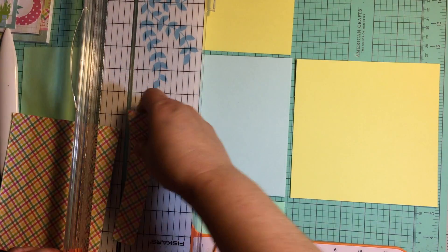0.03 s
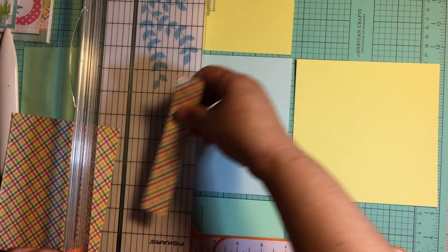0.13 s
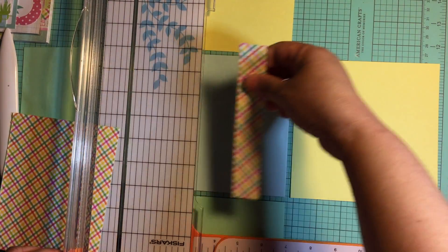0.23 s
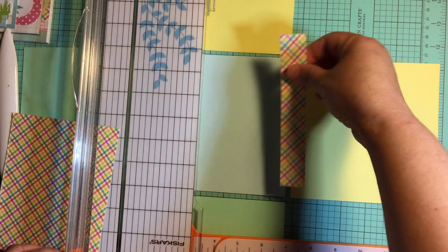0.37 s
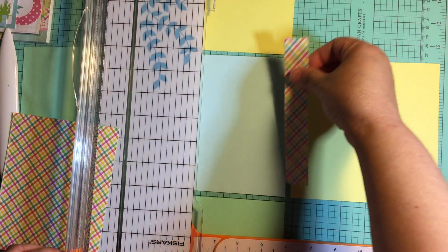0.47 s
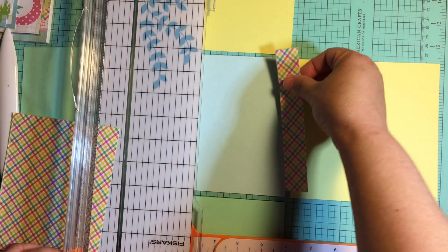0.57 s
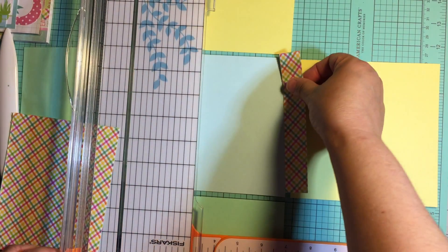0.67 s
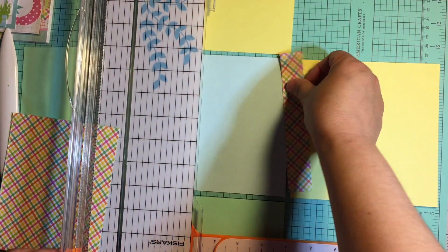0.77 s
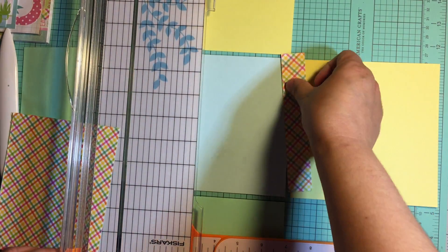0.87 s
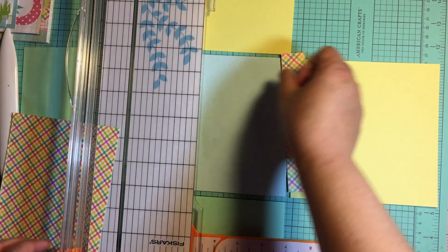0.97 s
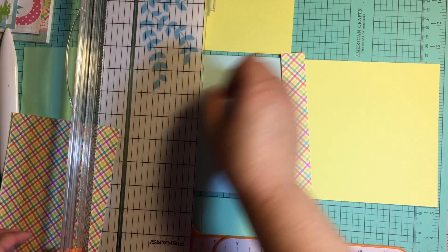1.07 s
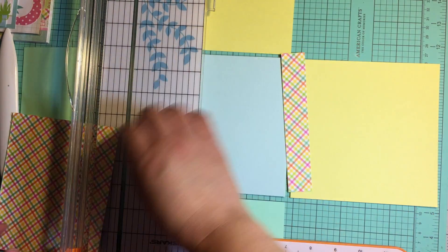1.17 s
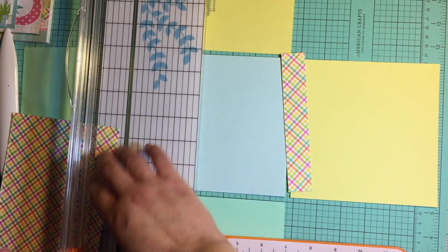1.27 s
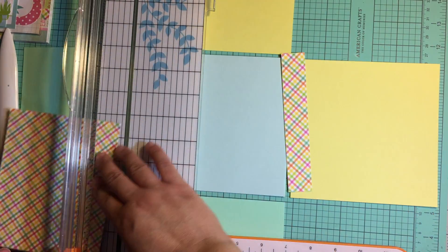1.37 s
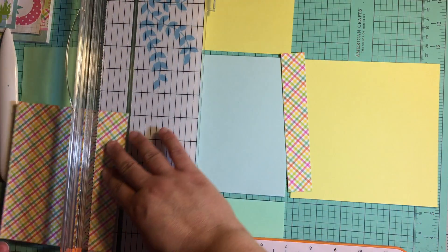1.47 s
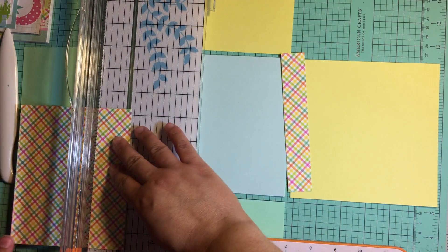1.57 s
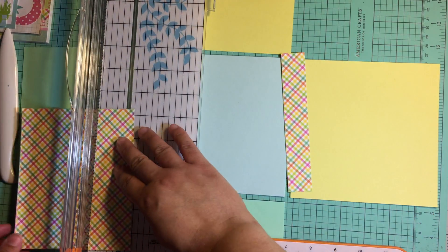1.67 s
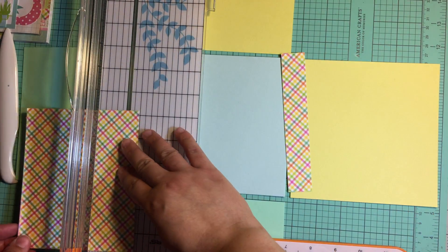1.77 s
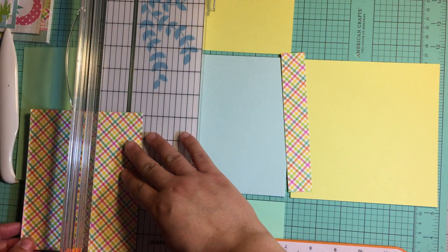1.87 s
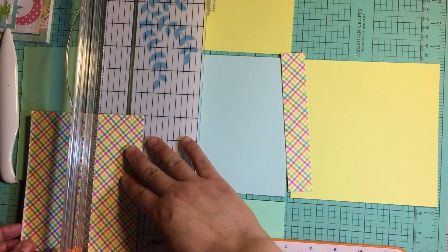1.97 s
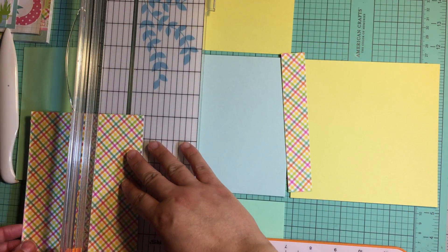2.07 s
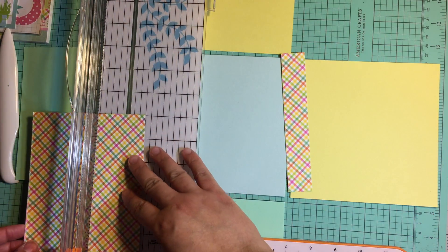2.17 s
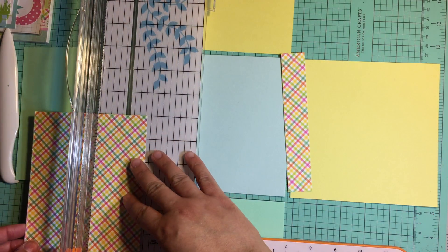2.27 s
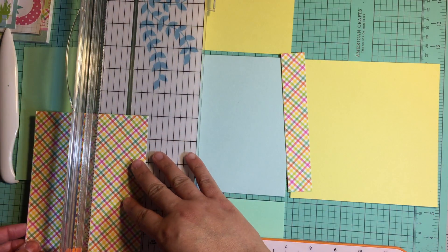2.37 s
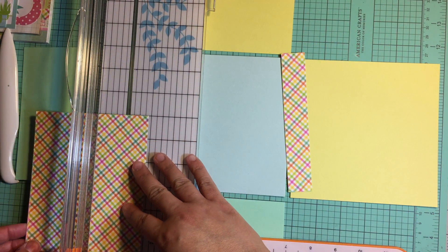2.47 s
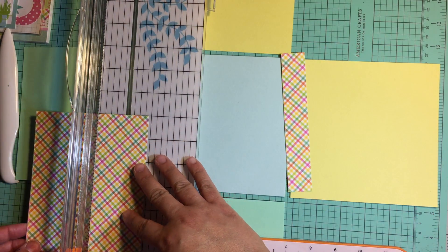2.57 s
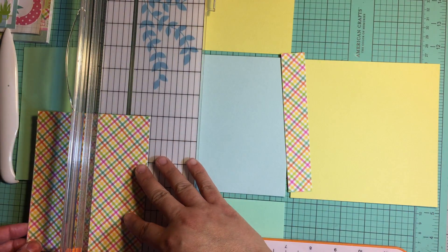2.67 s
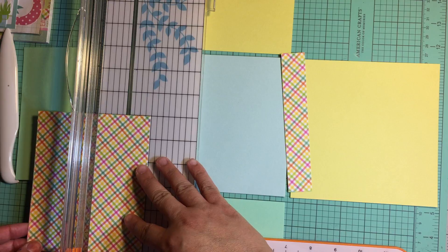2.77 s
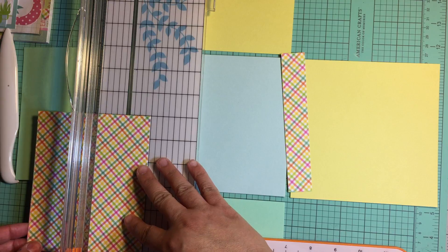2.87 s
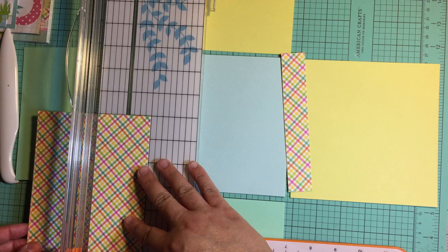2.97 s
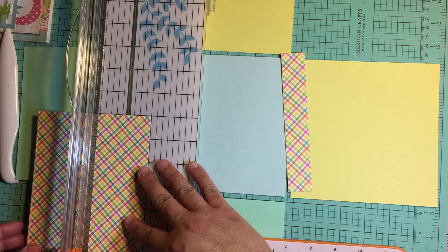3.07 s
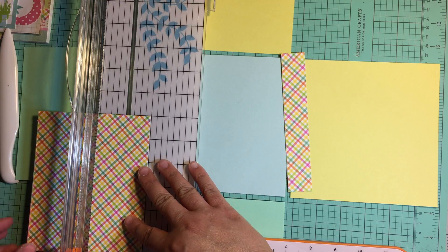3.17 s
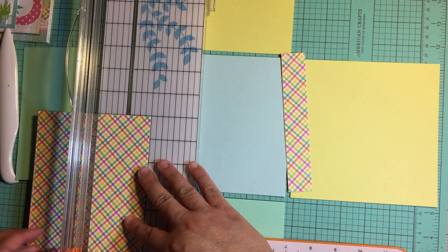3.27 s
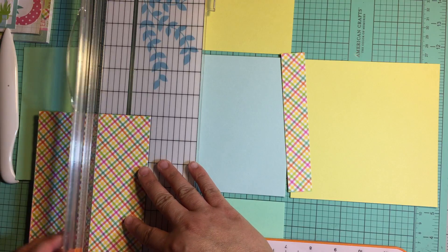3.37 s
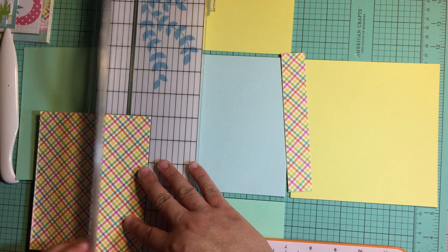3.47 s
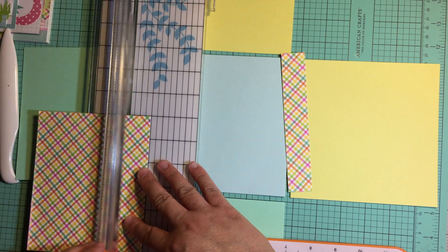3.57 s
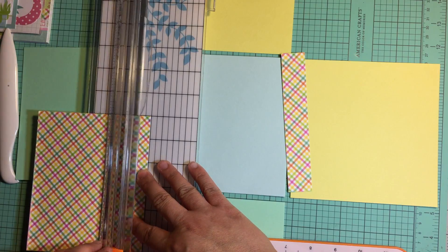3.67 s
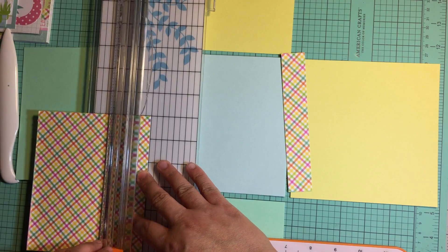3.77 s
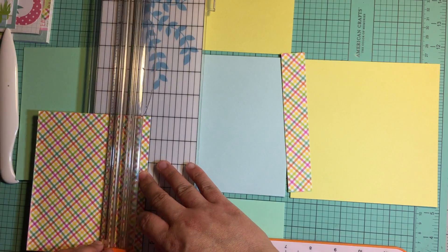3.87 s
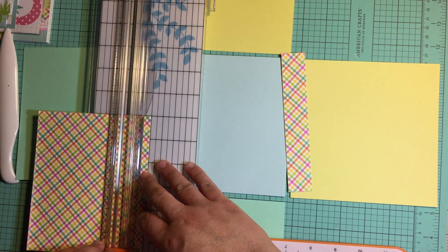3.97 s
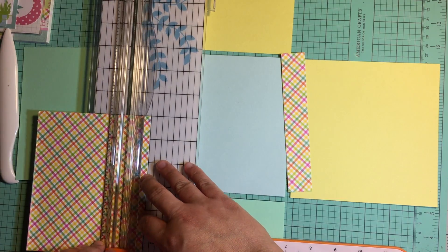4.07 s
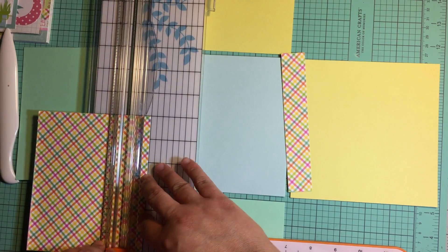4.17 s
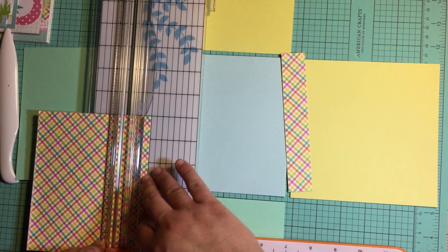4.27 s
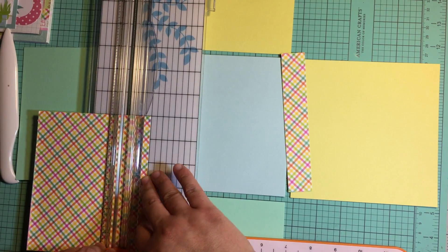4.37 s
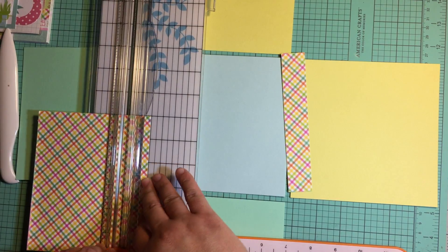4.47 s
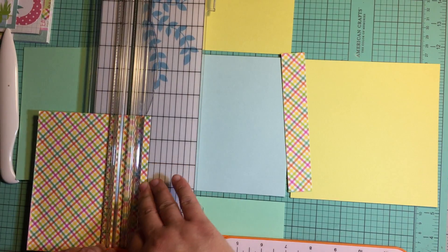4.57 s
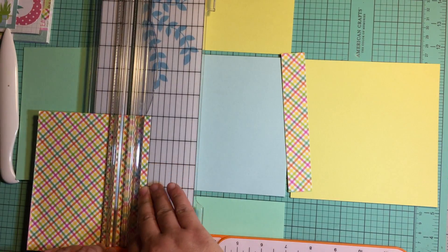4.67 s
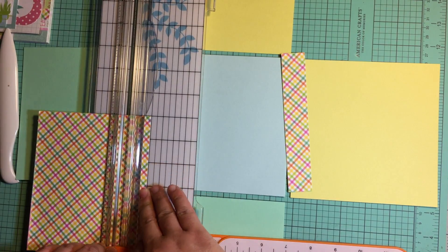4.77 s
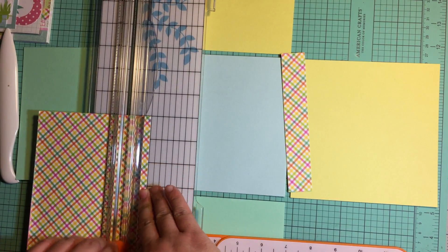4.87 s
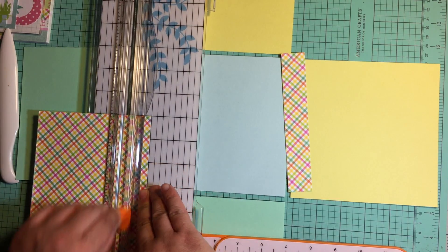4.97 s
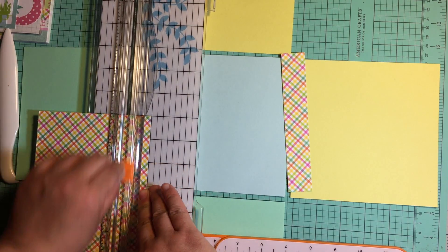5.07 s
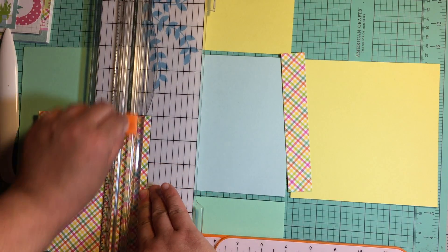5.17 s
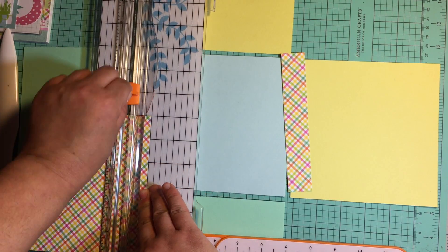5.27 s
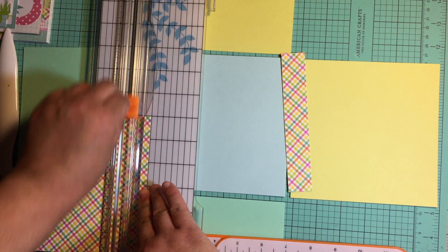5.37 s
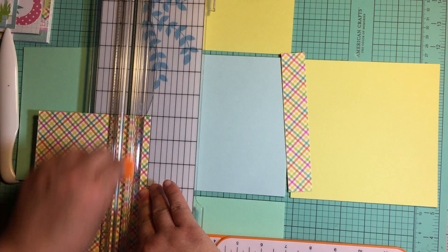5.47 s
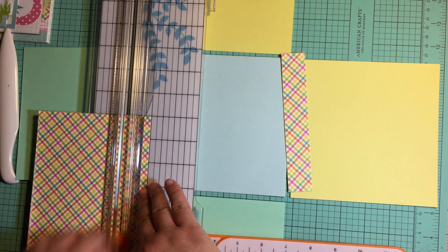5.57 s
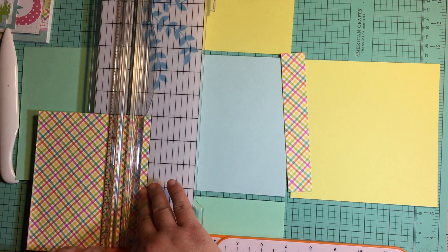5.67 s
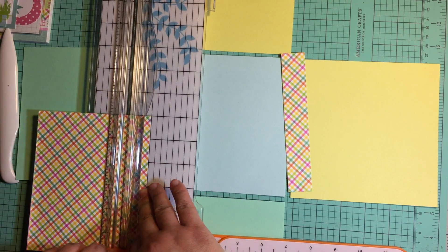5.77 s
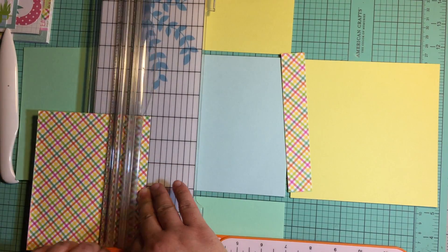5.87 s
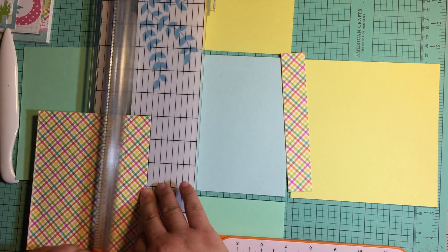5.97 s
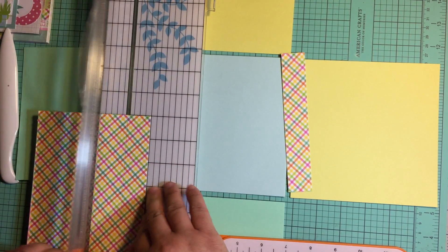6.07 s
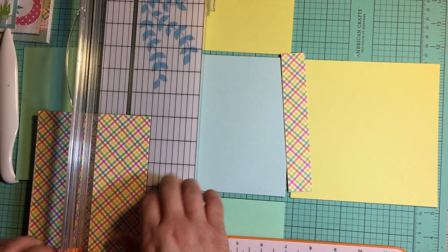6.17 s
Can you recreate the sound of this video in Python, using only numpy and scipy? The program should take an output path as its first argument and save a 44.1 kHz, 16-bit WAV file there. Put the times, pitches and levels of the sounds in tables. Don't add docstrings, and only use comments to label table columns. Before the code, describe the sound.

Close, quiet desk sounds: papery flicks and scuffs, a rattling plastic guide rail dropping, then two harsh blade scrapes ending in small knocks.

```python
import sys
import numpy as np
from scipy import signal
from scipy.fft import rfft, irfft, next_fast_len
from scipy.io import wavfile

SR = 44100
rng = np.random.default_rng(int(sys.argv[2]) if len(sys.argv) > 2 else 0)


def dump(signal):
    limited = np.clip(np.atleast_2d(signal).T, -1, 1)
    pcm = np.round(limited * 32767).astype(np.int16)
    wavfile.write(sys.argv[1], SR, pcm)


def linear_from_db(decibels):
    return 10 ** (np.asarray(decibels, float) / 20)


N = 274787


def rms_one(x):
    return x / np.sqrt(np.mean(x ** 2) + 1e-20)


def in_time(rows):
    s, *columns = np.transpose(rows)
    return [np.interp(np.arange(N) / SR, s, c) for c in columns]


def gains(tables, fade_s=0.015):
    out, t = 0, np.arange(N) / SR
    for rows in tables:
        start, end = rows[0][0], rows[-1][0]
        gate = np.interp(t, [start - fade_s, start, end, end + fade_s], [0, 1, 1, 0])
        out = out + gate * linear_from_db(np.array(in_time(rows)))
    return out


def slow_noise(noise, rate_hz, skip):
    r = np.exp(-2 * np.pi * rate_hz / SR)
    return signal.lfilter([1], [1, -2 * r, r * r], noise)[skip:]


def drift(rate_hz):
    return rms_one(slow_noise(rng.standard_normal(N + 9000), rate_hz, 9000))


def coloured(x, spectrum):
    hz, db = np.transpose(spectrum)
    size = next_fast_len(N)
    f = np.fft.rfftfreq(size, 1 / SR) + 1
    shape = linear_from_db(np.interp(np.log(f), np.log(hz), db, left=-90, right=-90))
    return rms_one(irfft(rfft(x, size) * shape, size)[:N])


def resonant(x, peaks):
    out = 0
    for k, (hz, width, db) in enumerate(peaks):
        r = np.exp(-np.pi * width / SR)
        poles = [1, -2 * r * np.cos(2 * np.pi * hz / SR), r * r]
        mode = signal.lfilter([(1 - r * r) / 2, 0, (r * r - 1) / 2], poles, x)
        out = out + (-1) ** k * linear_from_db(db) * mode
    return out


def band(x, low_hz, high_hz):
    return signal.sosfilt(signal.butter(2, [low_hz, high_hz], "band", fs=SR, output="sos"), x)


def grains(per_s, spread_db):
    sizes = linear_from_db(spread_db * np.minimum(rng.exponential(1, N), 5)) * rng.choice([-1, 1], N)
    return rms_one(sizes * (rng.random(N) < per_s / SR))


def ring(force, hz, t60):
    r, w = linear_from_db(-60 / (t60 * SR)), 2 * np.pi * hz / SR
    return signal.lfilter([0, np.sin(w)], [1, -2 * r * np.cos(w), r * r], force)


def blow(contact_s, buzz_db=-22, buzz_s=0.0087, rise_s=0.00045):
    t = np.arange(3000) / SR
    swell = (1 - np.exp(-t / (rise_s + 0.096 * contact_s))) ** 2
    decay = np.exp(-t / max(contact_s, 2e-4)) + linear_from_db(buzz_db) * np.exp(-t / buzz_s)
    return rms_one(swell * decay * rng.standard_normal(3000)) / np.sqrt(3000)


def strike(hz, t60, *contact, **shape):
    out = ring(blow(*contact, **shape), hz, t60)
    click = ring(np.arange(3000) == 0, hz, t60)
    scatter = linear_from_db(1.5 * rng.standard_normal())
    return out * np.linalg.norm(click) / np.linalg.norm(out) * scatter


def struck(hits, column, modes, gain_db):
    out = np.zeros(N + 3000)
    for hz, db, t60 in modes:
        for row in hits:
            out[round(row[0] * SR):][:3000] += linear_from_db(row[column] + db + gain_db) * strike(hz, t60, row[5])
    return out[:N]


def lasting(hits, contact_s):
    return [(*row, contact_s) for row in hits]


# (frequency [Hz], density [dB])
AIR = [(15, -34), (25, -21), (58, 2.5), (119, -4), (264, -11), (398, -12.5), (496, -16.5), (585, -15.5),
       (907, -17.5), (2300, -19.5), (2640, -21), (3880, -21.5), (10400, -28), (16100, -30), (17500, -35.5)]


def air():
    hum = rms_one(resonant(rng.standard_normal(N), [(122, 10, 0)]))
    return linear_from_db(-68) * coloured(rng.standard_normal(N), AIR) + linear_from_db(-72.5) * hum


# (frequency [Hz], level [dB], T60 [s])
KNOCK_MODES = [(1207, 4, 0.0058), (1500, -1, 0.0088), (1754, -7, 0.019)]


def knocks(hits):
    hollow = np.zeros(N + 3000)
    for s, snap_db, knock_db, hz, clack_db, contact_s in hits:
        hollow[round(s * SR):][:3000] += linear_from_db(knock_db + 5.5) * strike(hz, 0.017, contact_s, rise_s=0.0012)
    return band(hollow[:N] + struck(hits, column=2, modes=KNOCK_MODES, gain_db=-2.0), 570, 2600)


# (frequency [Hz], level [dB], T60 [s])
CLACK_MODES = [(2470, -0.5, 0.0021), (3420, 2, 0.0026), (4230, -5, 0.0025), (4850, -11.5, 0.0018)]


def clacks(hits, modes=CLACK_MODES, gain_db=3.5):
    return band(struck(hits, column=4, modes=modes, gain_db=gain_db), 1307, 8000)


# (frequency [Hz], level [dB], T60 [s])
SNAP_MODES = [(5440, 0, 0.0033), (6770, 1, 0.0029), (8500, 2, 0.0017), (9360, -3, 0.0019),
              (12100, -2, 0.0012), (13450, -20.5, 0.0018), (15400, -9.5, 0.0026)]


def snaps(hits, gain_db, low_hz, high_hz):
    return band(struck(hits, column=1, modes=SNAP_MODES, gain_db=gain_db), low_hz, high_hz)


def hard_blows(hits):
    return knocks(hits) + clacks(hits) + snaps(hits, -5.5, 4200, 14600)


# (time [s], edge snap [dB], knock [dB], knock pitch [Hz], clack [dB])
PAPER_TAPS = [
    (0.0004, -15.5, -36, 800, -22),
    (0.3223, -47, -47.5, 1770, -44),
    (0.4286, -45, -60, 1540, -54),
    (0.8555, -21, -45, 1700, -20.5),
    (1.4672, -47, -51.5, 1030, -73),
    (3.19, -79, -65, 1100, -74),
    (5.9388, -33, -44, 920, -48),
    (6.035, -41, -67, 964, -64.5),
]
# (time [s], edge snap [dB], knock [dB], knock pitch [Hz], clack [dB])
PAPER_SHOVES = [
    (0.9703, -66, -54, 1260, -47.5),
    (1.3855, -50, -47, 1010, -50),
    (1.4039, -32, -39.5, 1080, -37),
    (1.4208, -37, -39, 1050, -41.5),
    (2.0538, -62, -64, 1020, -45.5),
    (1.7035, -61, -45, 1080, -75),
    (1.72, -70, -48, 1130, -75),
    (1.672, -70, -50, 1000, -75),
    (2.039, -60, -48, 980, -47),
]
# (time [s], edge snap [dB], knock [dB], knock pitch [Hz], clack [dB])
PAPER_CRACKS = [
    (0.1262, -25, -70, 1880, -53),
    (0.13, -47, -75, 1880, -60),
    (0.17, -45, -71, 1800, -72),
    (0.4155, -52, -68, 1800, -61),
    (1.516, -25, -43.5, 1060, -71),
    (6.0352, -50, -68, 970, -65),
    (6.2055, -52, -68, 1340, -58),
    (5.861, -55, -59.5, 1010, -72),
    (5.888, -57, -74, 980, -70),
]
# (time [s], edge snap [dB], knock [dB], knock pitch [Hz], clack [dB])
SLAPS = [
    (0.8782, -8.5, -40, 1228, -21.5),
    (0.8832, -6.5, -31.5, 1024, -30.5),
]
# (frequency [Hz], level [dB], T60 [s])
SLAP_MODES = [(1900, -5, 0.004), (3310, 0, 0.0095), (4400, -7, 0.0025)]


def paper_blows():
    slaps = lasting(SLAPS, 0.001)
    taps = lasting(PAPER_TAPS, 0.0025) + lasting(PAPER_SHOVES, 0.0075) + lasting(PAPER_CRACKS, 0.00076)
    hits = taps + slaps
    clack = clacks(taps) + clacks(slaps, SLAP_MODES, gain_db=3.0)
    return knocks(hits) + clack + snaps(hits, -6.5, 3800, 17000)


# (time [s], peak level [dB], pitch [Hz])
THUDS = [(0.001, -46, 132), (0.884, -44, 123.4), (0.884, -38, 540), (0.002, -42, 340), (4.09, -46, 55),
         (4.2, -56, 50), (3.76, -50, 55), (1.397, -50, 106), (1.415, -52.5, 120), (1.504, -48, 124),
         (3.754, -42.5, 145), (3.821, -52, 334), (3.943, -48, 122), (3.977, -45.5, 133), (4.01, -48, 124),
         (4.084, -41.5, 122), (4.53, -51, 310), (4.8, -44, 235), (5.303, -34, 124), (5.421, -51, 289),
         (5.452, -44, 124), (5.712, -39.5, 114), (5.948, -49, 131), (5.981, -43, 193), (6.219, -48, 315)]


def desk_thuds():
    out = np.zeros(N + 9000)
    push = np.pad(np.hanning(round(0.0019 * SR)), (0, 9000))[:9000]
    push = push / push.sum()
    for s, db, hz in THUDS:
        i = round(s * SR)
        out[i:][:9000] += linear_from_db(db) * ring(push, hz, 19.3 / hz)
        board = strike(288.5, 0.021, 0.012, rise_s=0.0019)
        out[i:][:3000] += linear_from_db(db + 4.5) * band(board, 146.6, 572)
    return out[:N]


# (start [s], end [s], start level [dB], end level [dB], free edge in the air [dB])
RUBS = [(0.015, 0.028, -58, -71, 11.5), (0.045, 0.125, -68.5, -70.5, 25.5), (0.127, 0.18, -64, -78, 19),
        (0.193, 0.326, -76.5, -79.5, 26), (0.331, 0.392, -63.5, -77.5, 14), (0.408, 0.494, -68, -74.5, 12),
        (0.544, 0.632, -73, -65.5, -0.5), (0.724, 0.8, -70, -74, 0.5), (0.804, 0.861, -76, -50, 7),
        (1.44, 1.506, -72, -57, 1), (1.526, 1.651, -61, -60, 3.5), (1.67, 1.737, -71, -64.5, 1.5),
        (1.79, 2.063, -73.5, -73, 7), (2.17, 2.347, -65, -73, 3.5), (2.425, 2.769, -70.5, -71.5, 0.5),
        (3.777, 3.862, -55.5, -64, -12), (3.855, 3.944, -74, -62, 3), (3.965, 4.04, -54, -63.5, -37),
        (4.056, 4.073, -68, -44, 2.5), (4.172, 4.242, -70, -82, 9.5), (5.868, 5.94, -73, -68.5, -2)]


def rubbing():
    share = np.array([0, 0.35, 1])
    offset_db = np.array([0, -4, 0])
    spans = []
    for t0, t1, db0, db1, edge_db in RUBS:
        extra_db = edge_db * share + offset_db
        spans.append([(t0, *(db0 + extra_db)), (t1, *(db1 + extra_db))])
    return gains(spans)


# (frequency [Hz], density [dB])
DRAG = [(290, -48), (500, -9.5), (590, 2), (650, -45), (874, 3), (1990, 1), (2600, -5), (3380, -42.5),
        (5720, -120)]
# (frequency [Hz], width [Hz], level [dB])
SCUFF = [(2630, 467, -2.5), (3480, 580, -1.5), (4260, 660, -2)]
# (frequency [Hz], density [dB])
RUSTLE = [(2350, -49.5), (4000, -14), (4310, -18), (4970, -8.5), (7990, -1.5), (9440, -0.5), (10400, -3.5),
          (11700, -5), (15000, -9.5), (17500, -13.5)]
RUSTLE_BANDS = [3500, 5500, 7500, 10500, 13000, 17500]


def paper_friction():
    drag, scuff, rustle = rubbing()
    out = drag * linear_from_db(1.8 * drift(26.27) - 8) * coloured(grains(3000, 1.7), DRAG)
    out += scuff * linear_from_db(2.0 * drift(25) - 1.5) * rms_one(resonant(grains(5000, 3.3), SCUFF))
    flutter = linear_from_db(0.8 * drift(39.2))
    for low, high in zip(RUSTLE_BANDS, RUSTLE_BANDS[1:]):
        patches = linear_from_db(2.2 * drift(9))
        fibres = band(coloured(grains(5930, 2.6), RUSTLE), low, high)
        out += rustle * flutter * patches * linear_from_db(-7.0) * fibres
    return out


def glides(rows, width_hz, width_share):
    out = np.zeros(N)
    for t0, t1, hz0, hz1, db in rows:
        i, n = round(t0 * SR), round((t1 - t0) * SR)
        breath = slow_noise(rng.standard_normal(16000), width_hz + width_share * hz0, 2000)
        tone = np.sin(2 * np.pi * np.cumsum(np.linspace(hz0, hz1, n)) / SR)
        out[i:i + n] += linear_from_db(db) * np.hanning(n) ** 0.11 * rms_one(breath[:n]) * tone
    return out


# (start [s], end [s], start pitch [Hz], end pitch [Hz], level [dB])
STREAKS = [(0.03, 0.091, 1850, 1950, -56.5), (0.12, 0.307, 1900, 1850, -70), (0.305, 0.41, 2900, 3250, -67),
           (1.455, 1.553, 1100, 1150, -58), (1.562, 1.743, 1200, 870, -59.5),
           (1.456, 1.622, 1900, 1450, -62), (1.62, 1.738, 1800, 2150, -62.5),
           (1.56, 1.678, 2300, 2000, -67), (1.792, 2.039, 2240, 2950, -67),
           (1.862, 2.055, 1930, 2200, -65.5), (1.841, 2.014, 1200, 1520, -66.5),
           (1.862, 2.04, 900, 1030, -69.5), (2.16, 2.34, 2145, 2450, -71.5), (2.24, 2.383, 940, 1200, -75),
           (3.778, 3.94, 3300, 3500, -71.5), (3.782, 3.925, 1000, 1050, -70),
           (0.747, 0.858, 3450, 3200, -66), (3.75, 3.764, 7250, 7200, -44),
           (3.925, 3.955, 7100, 7000, -62.5), (5.63, 5.7, 1300, 1500, -52), (4.055, 4.082, 6900, 7100, -55),
           (1.52, 1.61, 2300, 1500, -59), (1.69, 1.76, 1100, 1800, -68), (1.77, 1.81, 1550, 1700, -69),
           (4.88, 4.97, 10900, 10900, -68), (5.96, 6.03, 3300, 4100, -65), (4.148, 4.256, 1000, 957, -73.5),
           (5.0, 5.144, 10400, 11000, -46), (5.137, 5.262, 9700, 10800, -44), (4.56, 4.78, 850, 580, -72.5)]


def whistles():
    return glides(STREAKS, 12, 0.055)


# (start [s], end [s], start pitch [Hz], end pitch [Hz], level [dB])
BRUSHES = [(3.15, 3.25, 2100, 860, -70.5), (1.5, 1.68, 1800, 2400, -61), (5.31, 5.365, 6500, 6500, -63.5),
           (5.52, 5.7, 5800, 5400, -54), (3.5, 3.63, 7900, 6700, -66), (5.02, 5.22, 5700, 5300, -38),
           (6.036, 6.044, 9800, 9500, -58), (5.94, 5.962, 12800, 12500, -57),
           (5.94, 5.985, 7300, 7000, -61), (5.855, 5.895, 5700, 5300, -72.5),
           (0.081, 0.15, 7800, 8200, -48), (0.2, 0.28, 9000, 8500, -58.5), (6.206, 6.23, 9000, 5700, -69),
           (3.94, 4.06, 500, 450, -63), (1.58, 1.68, 6300, 7200, -65.5), (1.6, 1.66, 10000, 10000, -60.5)]


def brushes():
    return glides(BRUSHES, 0, 0.18)


# (time [s], edge snap [dB], knock [dB], knock pitch [Hz], clack [dB])
RAIL_TAPS = [(3.4556, -83, -56, 1080, -63), (3.4695, -61, -54.5, 1080, -65.5),
             (3.4853, -58, -59, 1010, -68), (3.7429, -37, -38.5, 1120, -40),
             (3.7488, -21, -40.5, 990, -26.5), (3.7593, -41, -31.5, 1150, -29),
             (3.8194, -60, -50.5, 1150, -60), (3.79, -65, -50, 1000, -60), (3.848, -70, -55, 960, -70),
             (3.905, -70, -57, 1050, -70), (3.937, -44, -48.5, 1010, -60), (3.9709, -51, -42, 1360, -45.5),
             (3.9854, -60, -45.5, 1020, -66.5), (4.0028, -62.5, -45, 790, -63),
             (4.041, -71, -51, 1370, -71.5), (4.073, -46.5, -42.5, 870, -60),
             (4.0875, -32, -49.5, 1010, -56)]
# (time [s], edge snap [dB], knock [dB], knock pitch [Hz], clack [dB])
BOUNCES = [
    (4.103, -30.5, -38.5, 940, -46),
    (4.114, -35.5, -65, 950, -55),
    (4.122, -32, -39.5, 950, -49),
    (4.135, -32.5, -66, 950, -60),
    (4.142, -31, -43, 950, -53),
    (4.159, -36.5, -61, 950, -52),
    (4.164, -41, -57, 950, -57),
    (4.179, -45, -65, 950, -70),
    (4.197, -45, -67, 947, -64),
    (4.217, -54, -70, 950, -70),
]
# (time [s], edge snap [dB], knock [dB], knock pitch [Hz], clack [dB])
RAIL_CRACKS = [
    (4.0815, -18, -24.5, 1287, -15),
    (4.093, -18.5, -53, 1000, -41),
]
# (driving column [index], frequency [Hz], level [dB], T60 [s])
RAIL_RINGS = [(2, 960, -8, .045), (4, 3800, 5, 0.014)]


def rail_blows():
    hits = lasting(RAIL_TAPS + BOUNCES, 0.003) + lasting(RAIL_CRACKS, 0.00076)
    rings = sum(struck(hits, column=c, modes=[mode], gain_db=-5.0) for c, *mode in RAIL_RINGS)
    return hard_blows(hits) + band(rings, 480, 8000)


# (time [s], edge snap [dB], knock [dB], knock pitch [Hz], clack [dB])
CARRIAGE_KNOCKS = [
    (4.5356, -71.5, -45, 980, -82.5),
    (4.7882, -50.5, -53, 1060, -53),
    (4.9625, -52.5, -40, 1450, -51),
    (5.304, -45, -34.5, 1120, -52),
    (5.7232, -50, -30, 1035, -30.5),
    (5.9475, -45, -36, 990, -57),
    (5.9713, -42.5, -37.5, 1750, -34),
    (6.136, -72, -58.5, 1377, -67.5),
    (6.217, -63.5, -43, 1500, -48.5),
]
# (time [s], edge snap [dB], knock [dB], knock pitch [Hz], clack [dB])
CARRIAGE_SHOVES = [
    (5.4168, -61, -29, 746, -44),
    (5.4495, -42, -33, 680, -33),
    (4.7964, -56, -45.5, 1080, -44),
    (5.712, -52, -36, 1100, -49),
    (5.8921, -62, -43, 855, -64),
    (5.908, -56, -43, 1100, -55),
    (5.915, -58, -44, 900, -60),
    (5.9836, -67.5, -50, 1160, -47),
    (6.017, -61.5, -66, 1690, -49),
    (6.2244, -57, -35.5, 1450, -46),
]


def carriage_blows():
    return hard_blows(lasting(CARRIAGE_KNOCKS, 0.0015) + lasting(CARRIAGE_SHOVES, 0.0038))


# (time [s], rasp level [dB], bearing level [dB])
STROKES = [
    [(4.88, -76, 2), (4.898, -63, -4), (4.955, -53, 1), (4.966, -45, -2), (5.03, -44.5, 3.5),
     (5.11, -41, 2.5), (5.304, -39.5, -1.5), (5.314, -59, -5), (5.37, -62, -2)],
    [(5.46, -59, -5), (5.482, -56.5, -3), (5.506, -49.5, 2.5), (5.56, -48, 3), (5.605, -47.5, 3.5),
     (5.63, -46, -2.5), (5.706, -50.5, -1), (5.724, -49.5, -1), (5.735, -69, -2)],
]


def stroke():
    rasp, = gains([[row[:2] for row in rows] for rows in STROKES])
    bearing_db, = in_time([row[::2] for rows in STROKES for row in rows])
    top_s, travel_s = 5.363, 0.44
    place = np.clip(1 - np.abs(np.arange(N) / SR - top_s) / travel_s, 0, 1)
    groove = rasp * linear_from_db(-7 + 5.5 * place + bearing_db)
    body = rasp * linear_from_db(1 - 7.5 * place)
    rumble = rasp * linear_from_db(-10.5 + 2 * place)
    return groove, body, rasp, rumble


# (frequency [Hz], density [dB])
RASP = [(1180, -55), (2000, -8), (3210, 3), (3450, 0), (3880, -2), (4490, -3.5), (5140, -13.5),
        (6220, -2.5), (7950, -5), (10600, -6.5), (11600, -7.5), (15800, -10.5), (17500, -15.5)]
# (frequency [Hz], width [Hz], level [dB])
RASP_PEAKS = [(3260, 430, -19), (3790, 710, 2), (5020, 280, 8.5), (5970, 670, -3.5), (8600, 250, -12)]
# (frequency [Hz], width [Hz], level [dB]); one common width is used
RAIL_MODES = [(2510, 35, -5), (3220, 170, -4), (3980, 200, -3), (5250, 230, 2.5), (5600, 68, 1),
              (6100, 110, 0), (7250, 93, -4), (8440, 77, -5), (9210, 92, -7), (10900, 160, -2),
              (11700, 18, -11), (13000, 38, -11), (13700, 90, -9)]
# (frequency [Hz], width [Hz], level [dB])
BODY_PEAKS = [(1100, 200, -3), (1450, 170, -0.5), (1770, 190, -4), (2100, 114, -3.5)]
# (frequency [Hz], width [Hz])
HOLLOW = (711, 137)


def blade():
    groove, body, rasp, rumble = stroke()
    scrape = linear_from_db(0.87 * drift(39)) * grains(6000, 2.54)
    rings = sum(linear_from_db(2.2 * drift(14)) * resonant(grains(7000, 3.0), [peak]) for peak in RASP_PEAKS)
    hiss = coloured(0.73 * scrape + rings, RASP)
    modes = sum(linear_from_db(3.5 * drift(20)) * resonant(scrape, [(hz, 67, db)]) for hz, width, db in RAIL_MODES)
    hiss += linear_from_db(-8.5) * rms_one(modes)
    for low, high in zip(RUSTLE_BANDS, RUSTLE_BANDS[1:]):
        hiss += (linear_from_db(1.5 * drift(10)) - 1) * band(hiss, low, high)
    top = band(hiss, 6900, 18000)
    hiss += top * (np.minimum(rasp / linear_from_db(-50), 1) ** 0.35 - 1)
    hollow = rms_one(band(resonant(scrape, [(*HOLLOW, 0)]), 555, 850))
    base = 0
    for k, peak in enumerate(BODY_PEAKS):
        base = base + linear_from_db(2.1 * drift(14.0)) * (-1) ** k * resonant(scrape, [peak])
    base = rms_one(band(base, 940, 2200))
    desk_modes = [(61, 40, -13), (124, 7.4, 3.5), (212.5, 30, -4.5), (295, 41, -3.5), (433, 150, -17.5)]
    desk = rms_one(band(resonant(scrape, desk_modes), 32, 500))
    return groove * linear_from_db(2.0 * drift(13.0)) * hollow + body * base + rasp * hiss + rumble * linear_from_db(3.5) * desk


def room(x):
    t60, build_s = 0.14, 0.0017
    t = np.arange(round(0.4 * SR)) / SR
    tail = rng.standard_normal(len(t)) * linear_from_db(-60 * t / t60) * (1 - np.exp(-t / build_s))
    tail = signal.sosfilt(signal.butter(1, [300, 7400], "band", fs=SR, output="sos"), tail)
    return signal.fftconvolve(x, rms_one(tail) / np.sqrt(len(t)))[:N]


def scene():
    floor = air()
    desk = paper_blows() + desk_thuds() + paper_friction() + whistles() + brushes()
    desk += rail_blows() + carriage_blows() + blade()
    return (desk + linear_from_db(-15.5) * room(desk) + floor)[None]


def top_cut(x):
    return signal.sosfilt(signal.butter(12, 17300, fs=SR, output="sos"), x)


# (frequency [Hz], width [Hz], depth [0-1])
MIC_DIPS = [(4860, 460, 0.2), (10400, 450, 0.5)]


def record(dry):
    x = signal.sosfilt(signal.butter(2, 40, "high", fs=SR, output="sos"), dry)
    for hz, width, depth in MIC_DIPS:
        x = x - depth * resonant(x, [(hz, width, 0)])
    return top_cut(x)


dry = scene()
out = record(dry)
dump(out)
```